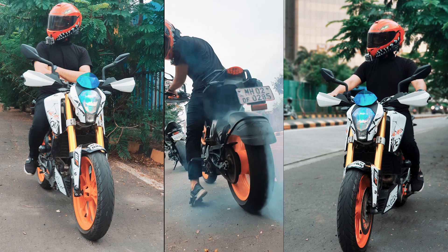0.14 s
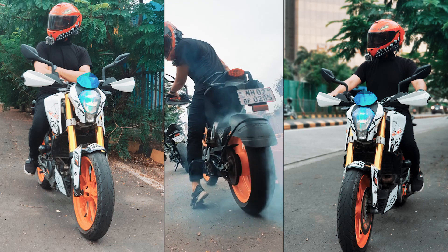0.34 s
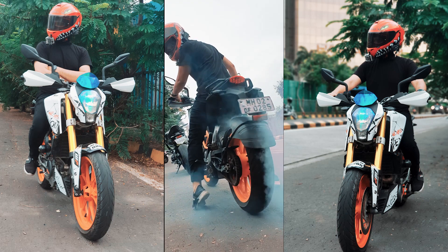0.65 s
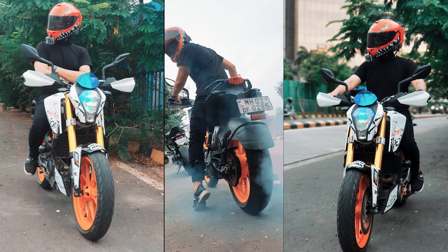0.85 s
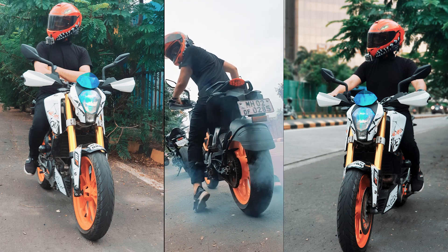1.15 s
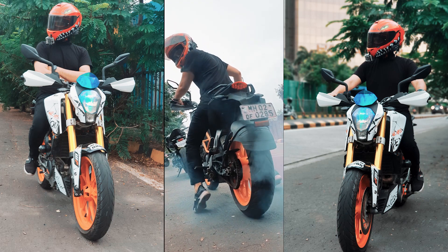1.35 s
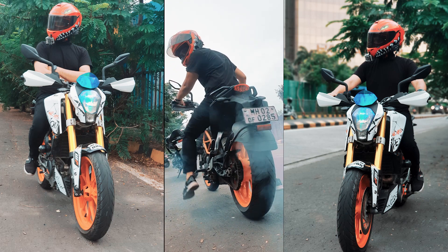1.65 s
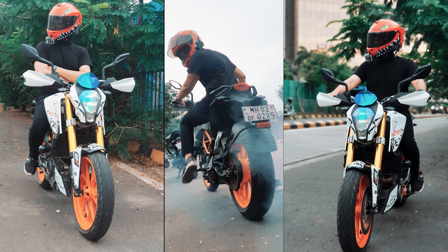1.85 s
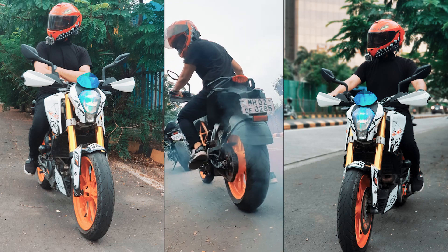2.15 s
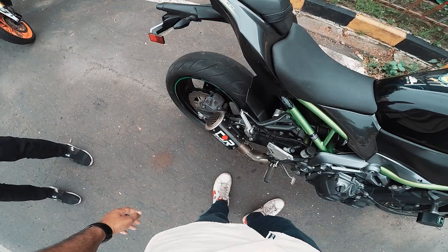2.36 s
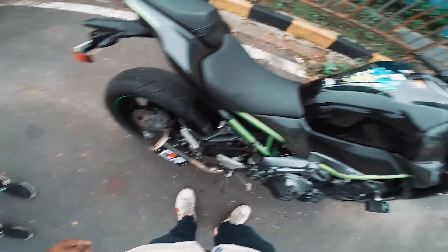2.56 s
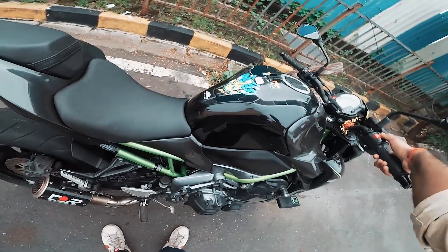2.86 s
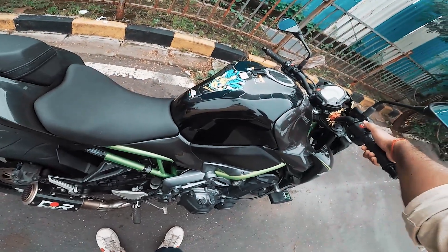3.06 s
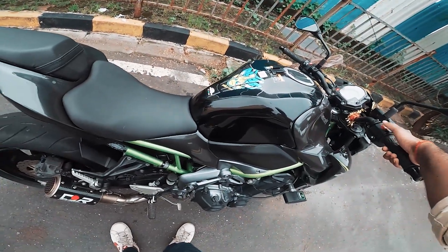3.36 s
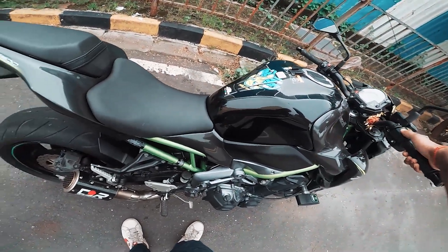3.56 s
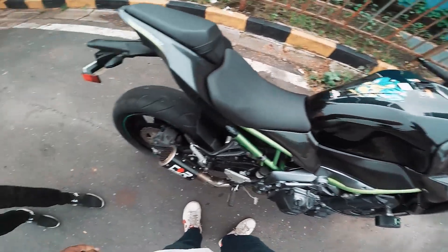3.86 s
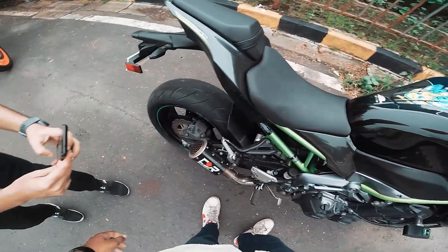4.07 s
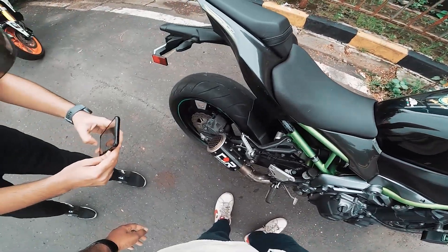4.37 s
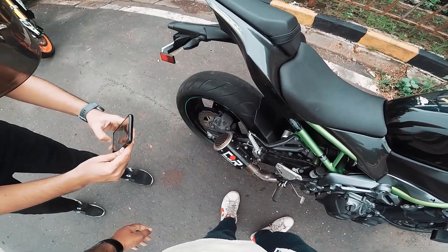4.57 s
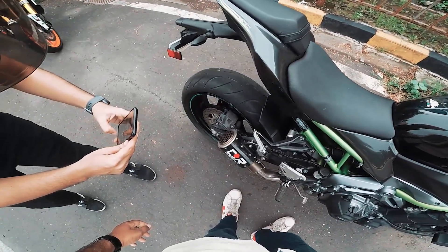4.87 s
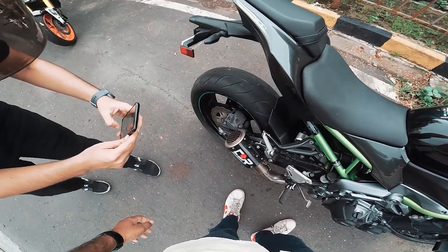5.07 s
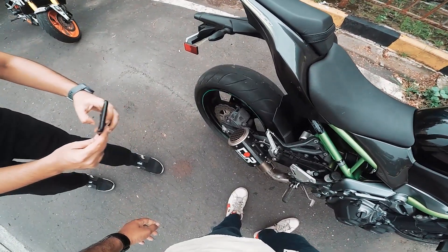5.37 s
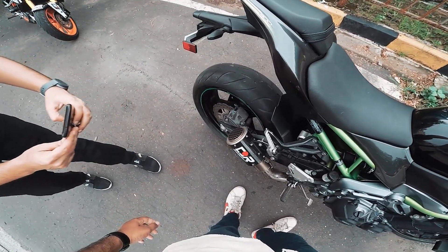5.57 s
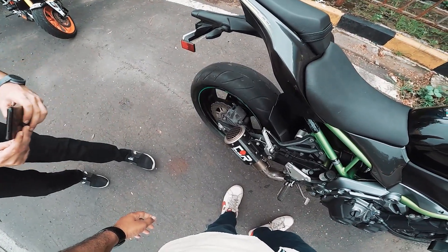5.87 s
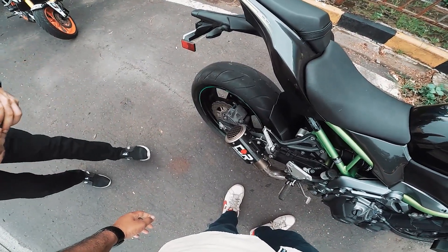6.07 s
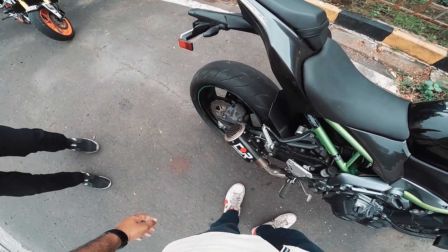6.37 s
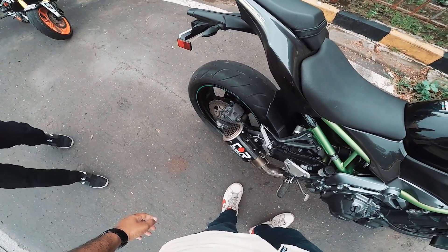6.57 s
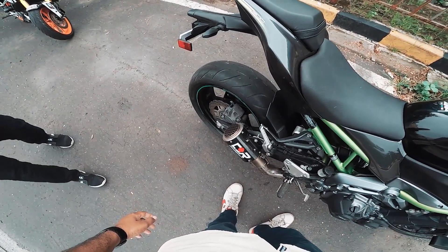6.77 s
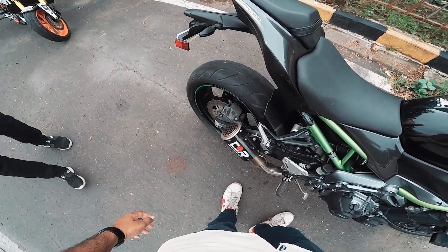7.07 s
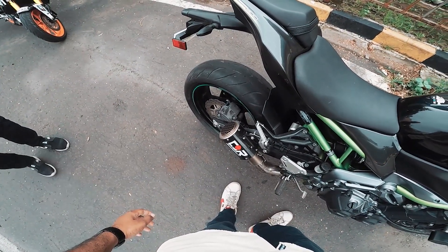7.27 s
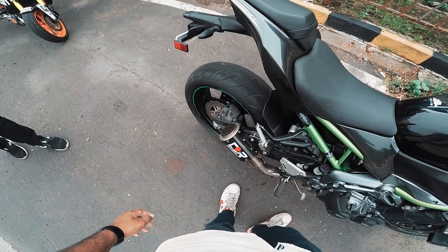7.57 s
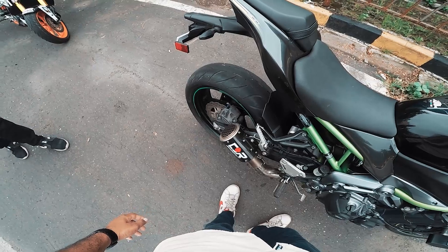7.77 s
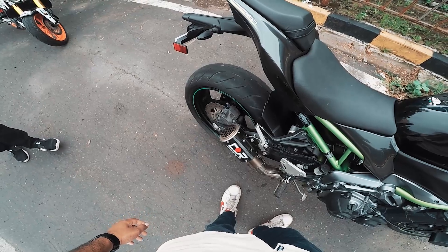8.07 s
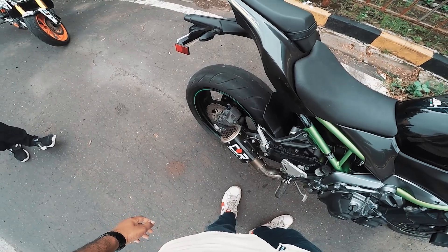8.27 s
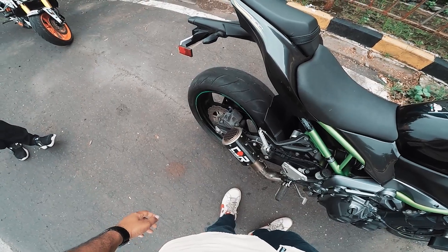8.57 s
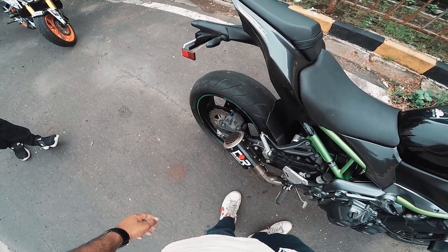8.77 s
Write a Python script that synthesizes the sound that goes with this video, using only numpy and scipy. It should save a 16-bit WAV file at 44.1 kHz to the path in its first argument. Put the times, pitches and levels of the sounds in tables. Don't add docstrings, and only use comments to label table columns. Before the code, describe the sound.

A fast, stuttering single-cylinder drone with rough tyre hiss bangs once and slows into separate dull puffs, then quiet ticks. The scene cuts to traffic rumble, a sharp key click and grinding starter gears. A deeper, smoother four-cylinder engine fires up and stumbles at idle, then is revved gently, higher and highest, each time falling back with a hollow coasting hum. Close stereo outdoors.

```python
import sys
import numpy as np
from scipy import signal
from scipy.fft import rfft, irfft
from scipy.io import wavfile
from scipy.ndimage import uniform_filter1d, minimum_filter1d

SR = 44100
rng = np.random.default_rng(int(sys.argv[2]) if len(sys.argv) > 2 else 0)


def output_pcm(signal):
    pcm = np.clip(np.atleast_2d(signal).T, -1, 1) * 32767
    wavfile.write(sys.argv[1], SR, np.round(pcm).astype(np.int16))


def decibels_to_gain(level_db):
    exponent = np.asarray(level_db, float) / 20
    return 10 ** exponent


N = 393372
T = np.arange(N) / SR


def columns(table):
    s, *rest = np.transpose(table)
    return [np.interp(T, s, c) for c in rest]


def look_up(x, table):
    return np.interp(x, *np.transpose(table))


def ramp(x):
    return np.clip(x, 0, 1)


def gate(t0, t1, fade=0.0018):
    return ramp((T - t0) / fade) * ramp((t1 - T) / fade)


def after(s, fade_s, attack_s=0.0034):
    return ramp((T - s) / attack_s) * np.exp(-np.clip(T - s - attack_s, 0, None) / fade_s)


def even(x, span=0.065):
    power = np.mean(np.atleast_2d(x) ** 2, axis=0)
    k = int(span * SR)
    return x / np.sqrt(uniform_filter1d(uniform_filter1d(power, k), k) + 1e-14)


def ring(x, modes):
    out = 0
    for k, (hz, width, db) in enumerate(modes):
        out = out + (-1) ** k * decibels_to_gain(db) * signal.lfilter(*signal.iirpeak(hz, hz / width, SR), x)
    return out


def band(x, lo_hz, hi_hz, order=3):
    return signal.sosfilt(signal.butter(order, [lo_hz, hi_hz], "band", fs=SR, output="sos"), x)


def low_pass(x, hz, order):
    return signal.sosfiltfilt(signal.butter(order, hz, fs=SR, output="sos"), x)


def noise(colour, apart_hz, wide=1.0, lead=((0, 0), (1, 0))):
    hz = np.maximum(np.fft.rfftfreq(N, 1 / SR), 1)
    colour_hz, colour_db = np.transpose(colour)
    gain = decibels_to_gain(np.interp(np.log(hz), np.log(colour_hz), colour_db))
    mid, side = rfft(rng.standard_normal((2, N))) * gain
    side = wide * side * np.minimum(hz / apart_hz, 1)
    left = (mid + side) * np.exp(1j * look_up(hz, lead))
    x = irfft(np.array([left, mid - side]), N)
    return x / x.std()


def hiss_noise():
    return rng.standard_normal(N)


def walk(rate):
    k = int(SR / rate)
    held = np.repeat(rng.standard_normal(N // k + 1), k)
    return uniform_filter1d(uniform_filter1d(held, k), k)[:N]


def pan(x, db):
    return x * decibels_to_gain(np.array([[db / 2], [-db / 2]]))


def fire(hz, start, scatter_db, jitter, pattern_db=(0,)):
    turns = start + np.cumsum(hz) / SR
    at = np.flatnonzero(np.diff(np.floor(turns)) > 0)
    chance = rng.standard_normal((4000, 2))[:len(at)].T
    place = at + (np.ceil(turns[at]) - turns[at] + jitter[at] * chance[0]) * SR / hz[at]
    place = np.clip(place, 0, N - 2)
    size = decibels_to_gain(scatter_db[at] * chance[1] + np.resize(pattern_db, len(at)))
    pulses, whole = np.zeros(N), place.astype(int)
    np.add.at(pulses, whole, size * (1 - place + whole))
    np.add.at(pulses, whole + 1, size * (place - whole))
    return pulses, turns % 1


def coast(s, hz, friction_hz, drag):
    return (hz + friction_hz) * np.exp(-drag * np.maximum(T - s, 0)) - friction_hz


# (time [s], level [dB])
YARD_LEVEL = [(1.6, -40.5), (1.756, -42), (1.982, -40.5), (2.43, -35.5)]
ROAD_LEVEL = [(2.43, -31), (2.608, -30.5), (3.604, -33.5), (3.794, -32), (4.07, -34)]
# (frequency [Hz], level [dB per Hz])
YARD_COLOUR = [(15, -45), (25, -28), (66, -6), (354, -21.5), (529, -18.5), (621, -27.5), (1120, -22),
               (1630, -34), (2780, -34), (3350, -36.5), (15000, -69)]
ROAD_COLOUR = [(15, -46), (25, -12.5), (118, -10), (150, 0.5), (196, -5), (438, -13), (515, -19),
               (604, -19), (1120, -26), (1540, -28.5), (2850, -36.5), (3260, -39), (6200, -36.5),
               (8550, -36), (15000, -57)]
CHANGE_S = 2.43
LORRY_S, LORRY_DB, LORRY_RISE_DB_PER_S, LORRY_FALL_DB_PER_S, RUMBLE_DB = 2.63, -31.5, 29, 15, -46.5


def surroundings():
    yard = noise(YARD_COLOUR, 1600, wide=.9) * decibels_to_gain(columns(YARD_LEVEL)[0] + 0.52 * walk(13.0))
    road = noise(ROAD_COLOUR, 1100, wide=1.0)
    away_db = np.maximum(LORRY_RISE_DB_PER_S * (LORRY_S - T), LORRY_FALL_DB_PER_S * (T - LORRY_S))
    rumble_db = np.maximum(LORRY_DB - away_db, RUMBLE_DB) + 1.7 * walk(9)
    bass = even(band(road, 27.95, 148), span=.3) * decibels_to_gain(rumble_db)
    throb = band(road, 160, 600, order=2) * (decibels_to_gain(4.2 * walk(14)) - 1)
    road = band(road, 115, 6600) + 0.23 * band(road, 9600, 15000) + throb
    road = bass + pan(road, -2.7) * decibels_to_gain(columns(ROAD_LEVEL)[0])
    return yard * gate(-1, CHANGE_S) + road * gate(CHANGE_S, 10)


SQUEAK_S, SQUEAK_HZ, SQUEAK_DB, SQUEAK_LENGTH_S = 4.795, 3650, -34, 0.039


def squeak():
    hz = SQUEAK_HZ * (1 - 1.6 * (T - SQUEAK_S)) * (1 + 0.011 * walk(220))
    tone = np.sin(2 * np.pi * np.cumsum(hz) / SR)
    return pan(tone * gate(SQUEAK_S, SQUEAK_S + SQUEAK_LENGTH_S, fade=.012) * decibels_to_gain(SQUEAK_DB), -2)


# (time [s], peak level [dB], centre [Hz], time to fall 60 dB [s], left minus right [dB])
TICK_TIMES = [(1.4623, -35, 1050, 0.15, -6), (1.656, -19, 1050, 0.24, -1), (1.686, -31.5, 2570, 0.089, -8),
              (1.7088, -23.5, 1010, 0.11, -2.5), (1.73, -36.5, 1080, 0.085, -2),
              (1.8435, -29, 2800, 0.12, -4), (1.9883, -29, 1040, 0.088, -7), (2.665, -37, 1610, 0.26, -13),
              (3.4058, -31.5, 5780, 0.22, 3), (3.481, -29, 5000, .02, -5),
              (3.4843, -6.5, 6200, 0.014, -6.5), (3.493, -26.5, 6000, 0.084, 2),
              (3.5045, -28.5, 7000, 0.11, 1.5), (3.716, -28, 6700, 0.095, 4), (3.7285, -25, 6500, 0.14, -3),
              (3.742, -23.5, 6200, 0.14, 4), (4.0784, -12.5, 6150, 0.049, -7),
              (4.515, -21.5, 2337, 0.05, -5), (5.75, -16, 2030, 0.071, 4),
              (5.7764, -26.5, 1040, 0.076, -11), (5.805, -13, 1060, 0.018, -6),
              (6.5807, -17.5, 1010, 0.05, 4), (6.629, -22, 1990, 0.022, -1.5),
              (8.895, -38.5, 9010, 0.041, -3)]
# (frequency [Hz], width [Hz], level [dB])
TICK_BODY = [(1050, 260, -1), (2090, 880, 3), (3970, 2230, -1.5), (6570, 7200, -24), (8550, 1400, -25)]


def ticks():
    out = np.zeros((2, N))
    t = np.arange(SR // 4) / SR
    for s, db, hz, t60, pan_db in TICK_TIMES:
        burst = rng.standard_normal((3, len(t))) * decibels_to_gain(-60 * t / max(t60, .01)) * ramp(t / 0.00065)
        burst = burst[0] + 1.13 * burst[1:]
        body = ring(burst, TICK_BODY) + 2.6 * ring(burst, [(hz, 0.13 * hz, 0)])
        body = band(body, 640, 10000, order=2)
        i = int(s * SR)
        out[:, i:i + len(t)] += pan(body / np.abs(body).max() * decibels_to_gain(db), pan_db)[:, :N - i]
    return out


# (frequency [Hz], level [dB], time to fall 60 dB [s])
LOCK_RINGS = [(2450, -1, 0.018), (3600, -10, 0.02), (4930, 0, 0.02), (5636, 0, 0.013), (7100, -7, 0.044),
              (9318, -15.5, 0.015), (10160, -15.5, 0.0081)]
KEY_S, KEY_DB = 3.4843, -13.5


def key():
    t = np.maximum(T - KEY_S, 0)
    click = 0
    for hz, db, t60 in LOCK_RINGS:
        click = click + decibels_to_gain(db - 60 * t / max(t60, .004)) * np.sin(2 * np.pi * hz * t)
    return pan(click / np.abs(click).max() * decibels_to_gain(KEY_DB), -4)


# (time [s], gear mesh rate [Hz], effort [dB], share of clean whine [0-1])
STARTER_PUSHES = [
    [(4.078, 559, -22, 0.1), (4.1, 623, -21.5, 0.23), (4.165, 867, -17.5, 0.3), (4.191, 1105, -27.5, 0.16),
     (4.2, 1133, -18.5, 0.03), (4.24, 1097, -21.5, 0.58), (4.275, 972, -18.5, 0.68),
     (4.31, 652, -20.5, 0.28), (4.34, 639, -24.5, 0.28), (4.393, 648, -32, 0.05)],
    [(4.397, 1200, -14, 0.2), (4.408, 1050, -20.5, 0.22), (4.422, 1010, -17.5, 0.33),
     (4.45, 983, -24.5, 0.04), (4.5, 977, -33.5, 0)],
]
WHINE_LEVELS = [-9, -4.5, -4.5, -6, -7.5, -14, -6, -9.5]
# (frequency [Hz], level [dB per Hz])
GRIND_COLOUR = [(150, -39), (250, 3.5), (381, -2), (533, -8.5), (841, -9.5), (995, -16), (1790, -7),
                (2160, -14), (2550, -9), (3520, -3.5), (3960, -7.5), (6790, -7.5), (7760, -14.5),
                (14000, -56.5)]
# (frequency [Hz], width [Hz], level [dB])
CASING_RINGS = [(1010, 61, -1), (1313, 94, -0.5), (2164, 88, -4.5), (2610, 60, -5.5), (3505, 45, -7),
                (4480, 67, -3), (5780, 120, -8), (6140, 58, 0), (6700, 310, -11), (7590, 160, 1.5),
                (8470, 110, -7)]
CASING_DB, DEAF_HZ, DEAF_WIDTH_HZ = 13.5, 4000, 250


def starter():
    hz, effort_db, whine_share = columns(np.vstack(STARTER_PUSHES))
    turn = 2 * np.pi * np.cumsum(hz * (1 + 0.013 * walk(200))) / SR
    whine = 0
    for k, db in enumerate(WHINE_LEVELS):
        whine = whine + decibels_to_gain(db + 3.5 * walk(70)) * np.sin((k + 1) * turn)
    grind = noise(GRIND_COLOUR, 990, wide=0.71) * decibels_to_gain(2.5 * walk(60))
    share = ramp(whine_share)
    teeth = share * pan(whine, -8.5) + (1 - share) * grind
    teeth = teeth + decibels_to_gain(CASING_DB) * ring(teeth, CASING_RINGS)
    deaf = .3 + .7 * gate(3.7, 4.36, fade=.02)
    notched = signal.filtfilt(*signal.iirnotch(DEAF_HZ, DEAF_HZ / DEAF_WIDTH_HZ, SR), teeth)
    teeth = (1 - deaf) * teeth + deaf * notched
    mids = even(band(teeth, 280, 3200), span=0.074)
    top = even(band(teeth, 2960, 8800), span=0.067) * decibels_to_gain(0.5)
    air = even(band(grind, 10700, 16000), span=0.018) * decibels_to_gain(-25.5)
    return (mids + top + air) * decibels_to_gain(effort_db) * gate(4.076, 4.51, fade=.004)


# (time [s], firing rate [Hz])
LIMITER_BOUNCE = [
    (0.0, 80.36),
    (0.102, 85.2),
    (0.13, 80.4),
    (0.274, 84.13),
    (0.338, 81.14),
    (0.436, 77.7),
]
# (time [s], length [s])
SPARKS_CUT = [
    (.098, .054),
    (.283, .065),
    (.405, .047),
]
# (level at full speed [dB], slope [dB per octave], load on the limiter [dB per Hz])
PIPE_BY_SPEED, TYRE_BY_SPEED, HISS_BY_SPEED = (-15.5, 7.8, 0.87), (-16.5, 13.7, 0.01), (-23, 15.4, 0.64)
SINGLE_FRICTION_HZ, SINGLE_DRAG_PER_S, SINGLE_FULL_HZ = 200, .277, 81.5
GASP_S, GASP_DB, GASP_FADE_S = 1.455, 27.5, 0.053
KEY_OFF_DB, KEY_OFF_FADE_S = 3, 0.11


def single_controls():
    off_s, last_hz = LIMITER_BOUNCE[-1]
    coasting = np.maximum(coast(off_s, last_hz, SINGLE_FRICTION_HZ, SINGLE_DRAG_PER_S), 8)
    hz = np.where(T < off_s, columns(LIMITER_BOUNCE)[0], coasting)

    def by_speed(db, octave_db, load_db):
        return db + octave_db * np.log2(hz / SINGLE_FULL_HZ) + load_db * (hz - SINGLE_FULL_HZ) * (T < off_s)

    gasp_db = GASP_DB * after(GASP_S, GASP_FADE_S)
    missed = .8 * sum(gate(s, s + length, fade=.012) for s, length in SPARKS_CUT)
    pipe_db = by_speed(*PIPE_BY_SPEED) + KEY_OFF_DB * after(off_s, KEY_OFF_FADE_S, 0.055)
    return hz, pipe_db, by_speed(*TYRE_BY_SPEED) + gasp_db, by_speed(*HISS_BY_SPEED) + .6 * gasp_db, missed


# (time [s], peak level [dB], share of the upper pipe ring [0-1])
LAST_STROKES = [
    (1.179, -19.5, 0.94),
    (1.214, -17.5, 0.64),
    (1.253, -16, 0.49),
    (1.3, -16, 0.63),
    (1.349, -16, 0.28),
    (1.402, -18.5, 0.29),
    (1.464, -16.5, 0.42),
    (1.555, -23.5, 0.19),
]


def stroke_pulses():
    low, high = np.zeros((2, N))
    for s, db, share in LAST_STROKES:
        low[int(s * SR)], high[int(s * SR)] = decibels_to_gain(db), share * decibels_to_gain(db)
    return low, high


# (frequency [Hz], width [Hz], level [dB])
SINGLE_PIPE_RINGS = [(84.2, 14, 2.5), (153, 52, 1.5), (302, 47, 0.5), (425.5, 16.6, 5), (514, 68, -1.5),
                     (597, 53, -11.5)]
HEADER_RING = [(350, 64, -11)]
STROKE_RINGS = [(136, 26, 0), (294.4, 43, -8.5), (433, 16, 2.5), (61.4, 26, -5)]
# (frequency [Hz], width [Hz], level [dB])
BACKFIRE_RINGS = [(433, 43, 0.5), (250, 140, -8), (630, 170, -11.5)]
BACKFIRE_S, BACKFIRE_DB = .4435, -3.5
STOP_S = 1.178
SOFT_HZ, SOFT_SPAN_HZ, ECHO_S, ECHO_SHARE = 53.6, 16.5, 0.01317, 0.59
MISSED_DB, MISSED_BASS = 2, .8


def single_pipe(hz, pipe_db, missed, off, breath, low, high):
    def twice(x):
        return -band(x + ECHO_SHARE * np.roll(x, int(ECHO_S * SR)), 30, 870, order=2)

    soft = ramp((SOFT_HZ - hz) / SOFT_SPAN_HZ)
    firing = even(ring(breath, SINGLE_PIPE_RINGS) + off * ring(breath, HEADER_RING), span=0.052)
    pipe = even((1 - soft) * firing + soft * even(ring(twice(breath), STROKE_RINGS)), span=0.087)
    pipe = pipe * decibels_to_gain(pipe_db + MISSED_DB * missed) * gate(-1, STOP_S, fade=0.011)
    pipe = pipe + 130 * (ring(twice(low), STROKE_RINGS[::3]) - ring(twice(high), STROKE_RINGS[1:3]))
    bang = ring(1. * (np.arange(N) == int(BACKFIRE_S * SR)), BACKFIRE_RINGS)
    pipe = pipe - MISSED_BASS * missed * low_pass(pipe, 230, 2)
    return pipe - bang / np.abs(bang).max() * decibels_to_gain(BACKFIRE_DB)


# (frequency [Hz], level [dB per Hz])
TYRE_COLOUR = [(350, -36.5), (600, -7.5), (748, -8.5), (1400, -6.5), (1620, -10.5), (1850, -11),
               (2080, -11), (3300, -17.5), (4290, -40), (7260, -120)]
HISS_COLOUR = [(1650, -20.5), (2800, -4.5), (3140, -5.5), (3920, -1.5), (5000, -11.5), (5480, -11.5),
               (7040, -18.5), (12700, -25.5), (15500, -18)]
# (frequency [Hz], width [Hz], level [dB])
TYRE_PITCHES = [(1050, 170, -9), (1307, 49, 6.5), (2033, 130, -7), (2374, 63, 6), (2720, 230, -7)]
# (frequency [Hz], phase [rad])
LEFT_LEAD = [(0, 0.5), (1030, 0), (1500, -2.7), (2240, 0.4), (2840, -2.4), (4220, 0.4), (4910, -1.6),
             (16000, -5.5)]
TYRE_OFF_DB, KNOCK_DB = -3, -13.5
WHEEL_HZ, WHEEL_WIDTH_HZ, WHEEL_DB, WHEEL_FADE_S = 2425, 130, -36, .3


def single():
    hz, pipe_db, tyre_db, hiss_db, missed = single_controls()
    off_s = LIMITER_BOUNCE[-1][0]
    off = ramp((T - off_s) / 0.027)
    pulses, phase = fire(hz, .98, .7 + 7 * missed, .006 + .12 * missed)
    breath = pulses + .0025 * hiss_noise()
    low, high = stroke_pulses()
    pipe = single_pipe(hz, pipe_db, missed, off, breath, low, high)

    chuff = signal.lfilter([1], [1, -.9985], low / decibels_to_gain(pipe_db + 7.0))
    puff = np.where(T < STOP_S, 0.92 + .5 * np.exp(-phase / 0.28), 2.07 + 0.29 * np.minimum(chuff, 3))
    tyre = noise(TYRE_COLOUR, 1100, wide=0.46, lead=LEFT_LEAD)
    tyre = even(tyre + 1.52 * ring(tyre, TYRE_PITCHES), span=.2)
    tyre = tyre * puff * decibels_to_gain(tyre_db + TYRE_OFF_DB * off + 0.8 * walk(24.7))
    tyre = tyre + even(ring(breath, TYRE_PITCHES), span=0.088) * decibels_to_gain(tyre_db + KNOCK_DB)
    wheel = even(ring(tyre, [(WHEEL_HZ, WHEEL_WIDTH_HZ, 0)]), span=0.21)
    tyre = tyre + wheel * decibels_to_gain(WHEEL_DB) * after(off_s, WHEEL_FADE_S, .15)
    hiss = noise(HISS_COLOUR, 900, wide=0.95, lead=LEFT_LEAD) * puff * decibels_to_gain(hiss_db + 1.0 * walk(30))

    late = np.array([np.roll(pipe, 5), pipe])
    return pan(late, 2.1) + (pan(tyre, -3.5) + hiss) * gate(-1, 1.4, fade=0.056)


# (time [s], firings so far [count])
IDLE_HUNT = [(4.3, -4.4), (4.469, 0), (4.521, 2), (4.566, 4), (4.619, 6), (4.809, 12), (4.865, 14),
             (4.945, 17), (5.003, 19), (5.133, 23), (5.243, 27), (5.364, 31), (5.559, 38), (5.677, 42),
             (5.755, 45), (5.9, 50.8)]
# (opens [s], shuts [s], opening [0-1], peak firing rate [Hz], drag [1/s])
THROTTLE_BLIPS = [
    (5.748, 5.966, 0.65, 122.5, 1.24),
    (6.527, 6.819, 0.68, 184.3, 1.14),
    (7.395, 7.648, 0.88, 224.6, 0.92),
]
RISE_SKEW, FOUR_FRICTION_HZ, GOVERNOR_HZ, CRANK_HZ = .87, 40.4, 39.44, 25.92
OPEN_S, SHUT_S = 0.028, 0.0097
REACH_HZ = 179
BARK_LIFT_S, EASE_S = 0.028, .05


def blip_motion():
    hz = uniform_filter1d(np.maximum(np.gradient(columns(IDLE_HUNT)[0]) * SR, CRANK_HZ), size=1500)
    throttle, hand, cut, snap, reach, lift, ease = np.zeros((7, N))
    for opens, shuts, opening, peak_hz, drag in THROTTLE_BLIPS:
        swing = np.sin(np.pi / 2 * ramp((T - opens) / (shuts - opens)) ** RISE_SKEW) ** 2
        reach = np.where(T < opens, reach, peak_hz - REACH_HZ)
        start = hz[int(opens * SR)]
        up = start + (peak_hz - start) * swing
        down = (coast(shuts, peak_hz, FOUR_FRICTION_HZ, drag) ** 4 + GOVERNOR_HZ ** 4) ** .25
        hz = np.where(T < opens, hz, np.where(T < shuts, up, down))
        held = ramp((T - opens) * opening ** 2 / OPEN_S) * ramp((shuts + SHUT_S / 2 - T) / SHUT_S)
        hand = hand + held
        throttle = throttle + opening * held * ramp((T - opens) / 0.049)
        lift = lift + gate(opens, opens + BARK_LIFT_S + OPEN_S, OPEN_S)
        ease = ease + opening * ramp(1 - (shuts - T) / EASE_S) * (T < shuts + SHUT_S)
        cut = np.where(T < opens, cut, np.maximum(cut, T > shuts - SHUT_S))
        snap = snap + gate(shuts - SHUT_S / 2, shuts + SHUT_S, fade=0.24 * SHUT_S)
    return hz, throttle, hand, cut, snap, reach, lift, ease


# (time [s], depth [0-1], length [s])
IDLE_STUMBLES = [
    (4.579, 0.78, 0.15),
    (4.762, 0.4, 0.013),
    (4.936, 0.73, 0.039),
    (5.004, 0.32, 0.11),
    (5.257, 0.76, 0.034),
    (5.308, 0.13, .06),
    (5.487, 0.52, 0.048),
]
# (time [s], length [s], level [dB])
FRAME_SHUDDERS = [
    (4.6, .08, 1),
    (4.73, 0.051, 4.5),
    (4.945, 0.052, 5.5),
    (5.034, .1, 1),
    (5.302, .075, 5.5),
    (5.49, 0.037, -1),
    (8.774, 0.049, 2),
]
# (firing rate [Hz], level [dB])
COAST_BY_SPEED = [(48, -20.5), (80, -16.5), (110, -12.5), (165, -9), (220, -6.5)]
THUMP_BY_SPEED = [(35, -21.5), (50, -18), (100, -23), (118, -19.5), (132, -38), (146, -68), (220, -56)]
# (level at idle [dB], level at rest [dB], slope [dB per Hz], lowest level [dB])
BARK_BY_SPEED, GEAR_BY_SPEED = (-39.5, -52, 0.0864, -61), (-40.5, -48.5, 0.09, -47)
CATCH_S, CRANK_DB, IDLE_DB, CATCH_DB, CATCH_FADE_S, TAKE_UP_DB = 4.443, -28.5, -11.5, 5.5, 0.1, 4.5
STUMBLE_DB, STUMBLE_THUMP_DB, STUMBLE_FADE_S = -8.5, -1.2, 0.0088
OPEN_DB, EASE_DB, SHUT_DIP_DB, REFIRE_HZ, REFIRE_DB, BURBLE_DB = -9, -4.5, -4, 54.8, 6, -3.5
OPEN_BARK_DB, OPEN_BARK_DB_PER_HZ, OPEN_GEAR_DB, OPEN_THUMP_DB = -38, 0.0577, -42, -4
BARK_DB_PER_REACH_HZ, BARK_LIFT_DB = 0.06, 2
QUIET_HZ, QUIET_DB_PER_HZ, HUSH_DB_PER_REACH_HZ = 88.5, 0.6, -0.13


def four_controls():
    hz, throttle, hand, cut, snap, reach, lift, ease = blip_motion()
    stumble = ramp(sum(depth * gate(s, s + length, STUMBLE_FADE_S) for s, depth, length in IDLE_STUMBLES))
    lit = ramp((T - CATCH_S) / 0.019)
    refire = ramp((REFIRE_HZ - np.minimum(hz, np.roll(hz, 2200))) / 3)
    high_reach = np.maximum(reach, 0)
    uneven = ramp((72 + 1.5 * high_reach - hz) / 35)

    def mix(idle, coasting, opened):
        return hand * opened + (1 - hand) * (cut * coasting + (1 - cut) * idle)

    idle_db = CRANK_DB + lit * (IDLE_DB - CRANK_DB) + CATCH_DB * after(CATCH_S, CATCH_FADE_S)
    idle_db = idle_db + STUMBLE_DB * stumble
    pipe_db = mix(idle_db, look_up(hz, COAST_BY_SPEED) + REFIRE_DB * refire, OPEN_DB + EASE_DB * ease)
    burble = mix(0, ramp((reach - 10) / 30) * ramp((150 - hz) / 9), 0)
    pipe_db = pipe_db + SHUT_DIP_DB * snap + BURBLE_DB * burble

    thump_db = look_up(hz, THUMP_BY_SPEED) + STUMBLE_THUMP_DB * stumble + OPEN_THUMP_DB * throttle
    thump_db = thump_db + sum(db * gate(s, s + length, 0.015) for s, length, db in FRAME_SHUDDERS)
    thump_db = thump_db - 9 * gate(CATCH_S, IDLE_STUMBLES[0][0], fade=.02)
    thump_db = thump_db - 16 * ramp((CATCH_S - .05 - T) / 0.042)

    hush_db = QUIET_DB_PER_HZ * np.clip(QUIET_HZ - hz, 0, 30) - HUSH_DB_PER_REACH_HZ * high_reach

    def by_speed(at_idle_db, rest_db, slope_db, low_db):
        coasting_db = np.maximum(rest_db + slope_db * hz - hush_db, low_db)
        return at_idle_db + TAKE_UP_DB * after(CATCH_S, 0.065), coasting_db

    open_bark_db = OPEN_BARK_DB + OPEN_BARK_DB_PER_HZ * hz + BARK_DB_PER_REACH_HZ * reach + BARK_LIFT_DB * lift
    bark_db = mix(*by_speed(*BARK_BY_SPEED), open_bark_db)
    gear_db = mix(*by_speed(*GEAR_BY_SPEED), OPEN_GEAR_DB)
    burn = ramp(mix(.3 + .7 * lit - .4 * stumble, np.maximum(.3 * uneven, .8 * refire), 1))
    scatter_db = mix(5 - 2.7 * lit + 3.5 * stumble, 90 / hz + 1.8 * uneven, .7 + 40 / hz)
    return hz, pipe_db, thump_db, bark_db, gear_db, burn, ramp(throttle), scatter_db


# (time [s], tuning factor [ratio])
GAS_HEAT = [(4.46, 0.98), (4.58, 1.09), (4.62, 1.02), (4.74, 0.94), (4.93, 1.07), (4.96, 1.0), (5.1, 0.98),
            (5.27, 1.08), (5.31, .97), (5.5, 1.08), (5.56, 1.05), (5.68, 0.92), (5.76, 1.12), (5.9, 0.95)]
COLD, TUNING_STEP = .94, .1


def warmed(x, modes):
    place = np.clip((columns(GAS_HEAT)[0] - COLD) / TUNING_STEP, 0, 2)
    out = 0
    for k in range(3):
        tuned = [(hz * (COLD + k * TUNING_STEP), width, db) for hz, width, db in modes]
        out = out + ramp(1 - np.abs(place - k)) * ring(x, tuned)
    return out


# (frequency [Hz], width [Hz], level [dB])
BURNT_RINGS = [(172.7, 18.4, 6.5), (277.5, 27.8, 3), (355.7, 35.5, -5.5), (505, 46, -22)]
OPEN_RINGS = [(159, 144, -1.5), (298, 94, 6.5), (375, 88, 6.5), (570, 1000, -11)]
PUMP_RINGS = [(127, 139, 2.5), (197.6, 120, 8), (329.6, 147, 4), (573, 360, -10.5)]
OVERTONE_RINGS = [(880, 180, 2.5), (1310, 100, -5.5)]
PUMP_BRIGHT_HZ, PUMP_DB_PER_HZ, PUMP_DARKEST_DB = 175, .2, -9
GURGLE = 0.011
SILENCER_HZ, EDGE_DB = 656, -1.5
OVERTONE_DB, OVERTONE_FROM_HZ = -32, 91


def four_pipe(hz, burn, throttle, pulses, breath):
    idle = even(warmed(breath, BURNT_RINGS[:1]) - ring(breath, BURNT_RINGS[1:]))
    burnt = (1 - throttle) * idle + throttle * even(ring(breath, OPEN_RINGS))
    churn = GURGLE * ramp((PUMP_BRIGHT_HZ - hz) / 60) * band(hiss_noise(), 120, 520, order=2)
    gentle = decibels_to_gain(np.clip(PUMP_DB_PER_HZ * (hz - PUMP_BRIGHT_HZ), PUMP_DARKEST_DB, 0))
    pump = ring(breath, PUMP_RINGS[:2]) + ring(breath * gentle + churn, PUMP_RINGS[2:])
    pipe = (1 - burn) * even(pump) + burn * burnt
    pipe = low_pass(band(pipe, 107.3, 610, order=4), SILENCER_HZ, 6)
    edge = throttle * decibels_to_gain(EDGE_DB) * band(burnt, 610, 845)
    overtone = even(band(ring(pulses, OVERTONE_RINGS), 636, 1450, order=2)) * decibels_to_gain(OVERTONE_DB)
    overtone = (1 - burn) * ramp((hz - OVERTONE_FROM_HZ) / 30) * overtone
    return even(pipe + edge + overtone, span=.07)


# (frequency [Hz], width [Hz], level [dB])
THUMP_RINGS = [(51.4, 8.4, -4), (112.4, 20, -8.5)]
POP_DB, POP_HZ, POP_FADE_S = -28, 55, 0.011


def four_thump(breath, thump_db):
    thump = even(band(ring(breath, THUMP_RINGS), 41, 108.3), span=0.099) * decibels_to_gain(thump_db)
    for shuts in np.transpose(THROTTLE_BLIPS)[1]:
        gulp = np.sin(2 * np.pi * POP_HZ * (T - shuts))
        thump = thump + decibels_to_gain(POP_DB) * after(shuts, POP_FADE_S, 0.0083) * gulp
    return thump


# (frequency [Hz], width [Hz], level [dB])
BARK_RINGS = [(804, 145, 4), (1300, 79, 3), (1716, 276, -1.5), (2265, 930, -8.5), (4300, 590, -33)]
# (frequency [Hz], level [dB per Hz])
GEAR_COLOUR = [(350, -30), (600, 2), (687, -24.5), (852, -10.5), (1050, -14), (2340, -10), (4770, -20.5),
               (6340, -16.5), (11200, -44.5), (13500, -58.5), (15000, -47)]
RASP_DB = -15
LINGER = 0.67


def four_bark(hz, throttle, bark_db, gear_db, pulses, phase):
    crack = even(ring(pulses * decibels_to_gain(4.5 * walk(60)), BARK_RINGS))
    crack = crack + 0.52 * np.exp(-phase / 0.58) * even(band(hiss_noise(), 700, 4400))
    rasp = even(band(pulses, 2200, 4730)) * decibels_to_gain(RASP_DB + 0.082 * (hz - 231.0))
    gear = noise(GEAR_COLOUR, 900, wide=0.58) * (0.7 + 0.91 * np.exp(-phase / 0.18)) * decibels_to_gain(2.16 * walk(30))
    mids = even(band(gear, 470, 2030), span=0.37)
    mids = mids + LINGER * ramp((hz - 90) / 100) * even(ring(pulses, BARK_RINGS))
    bark = throttle * pan(even(crack) + rasp, -4.5) + (1 - throttle) * mids
    top = band(gear, 2690, 15000) + 0.16 * throttle * band(crack, 2900, 5600)
    return bark * decibels_to_gain(bark_db) + even(top, span=0.27) * decibels_to_gain(gear_db)


CYLINDER_LEVELS = [-3, -1.9, 0.6, -2.3]
PIPE_LAG_S = .0095


def four():
    hz, pipe_db, thump_db, bark_db, gear_db, burn, throttle, scatter_db = four_controls()
    first = -np.sum(hz[T < IDLE_HUNT[1][0] - PIPE_LAG_S]) / SR
    pulses, phase = fire(hz, first, scatter_db, .012 * scatter_db, CYLINDER_LEVELS)
    breath = pulses + .0028 * scatter_db * hiss_noise()
    pipe = four_pipe(hz, burn, throttle, pulses, breath) * decibels_to_gain(pipe_db)
    thump = four_thump(breath, thump_db)
    bark = four_bark(hz, throttle, bark_db, gear_db, pulses, phase)
    deep = (pan(pipe, -2.25) + pan(thump, -.4)) * gate(4.27, 10, fade=0.02)
    return deep + bark * gate(4.47, 10, fade=0.055)


def scene():
    return surroundings() + squeak() + ticks() + key() + starter() + single() + four()


CEILING, LIMIT_S = .97, .006


def band_limit(x):
    return signal.sosfilt(signal.butter(12, 15610, fs=SR, output="sos"), x)


def record(dry):
    k = int(LIMIT_S * SR)
    gain = np.minimum(CEILING / (np.abs(dry).max(axis=0) + 1e-9), 1)
    held = dry * uniform_filter1d(minimum_filter1d(gain, 2 * k), k)
    return band_limit(held)


dry = scene()
out = record(dry)
output_pcm(out)
```